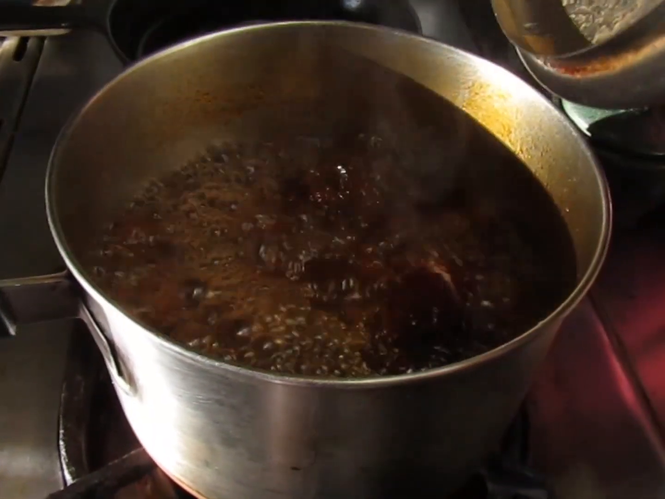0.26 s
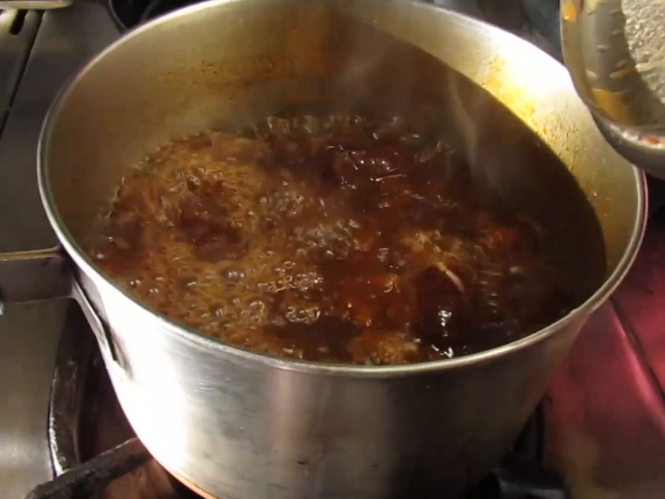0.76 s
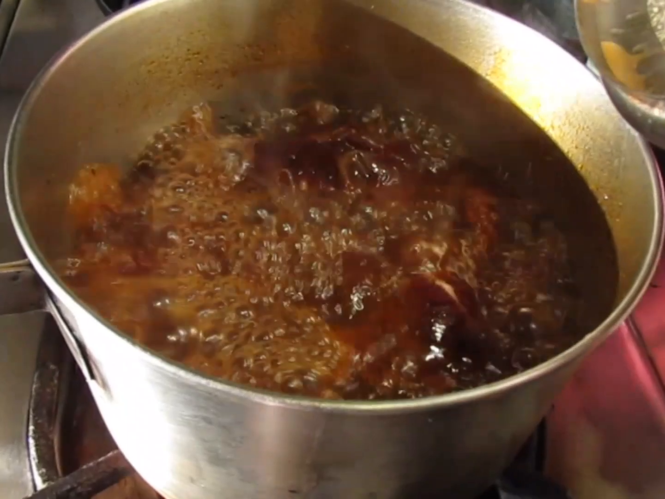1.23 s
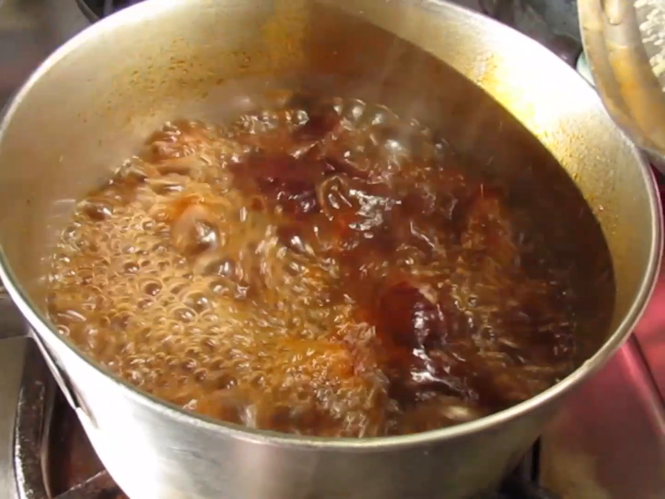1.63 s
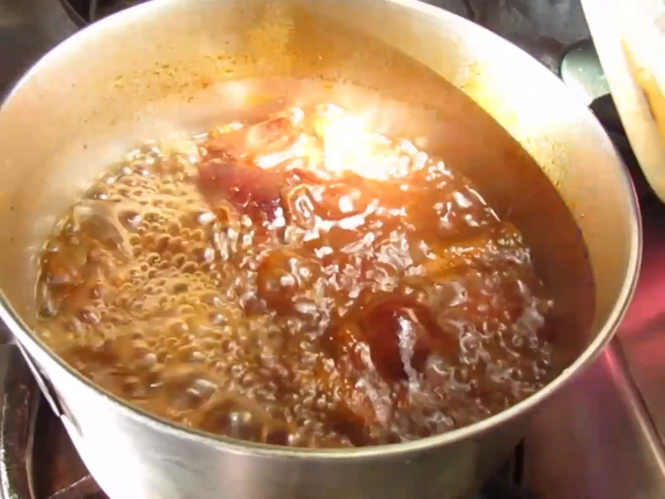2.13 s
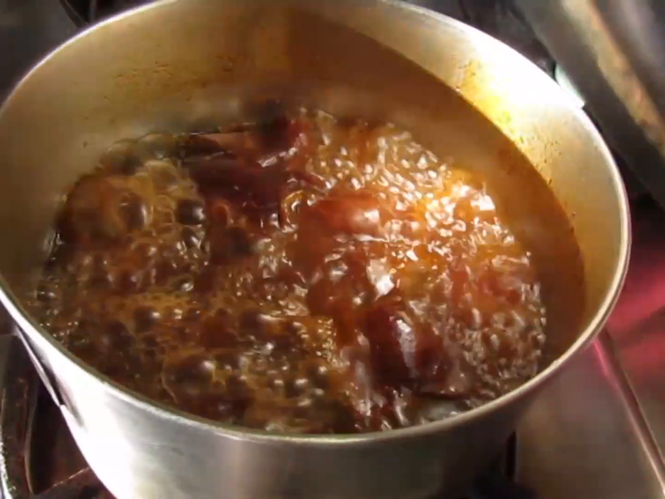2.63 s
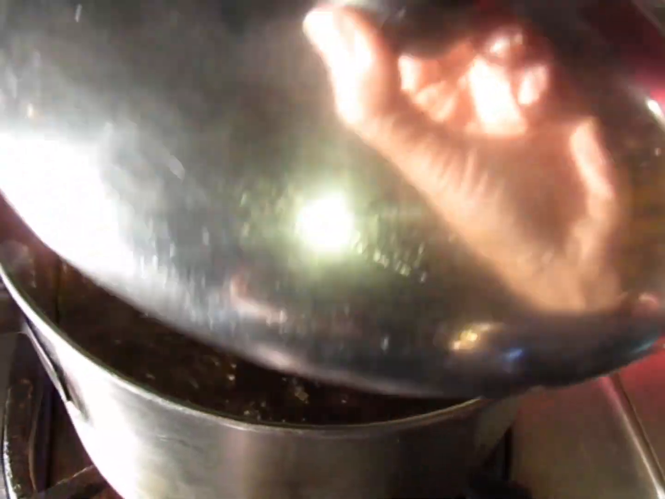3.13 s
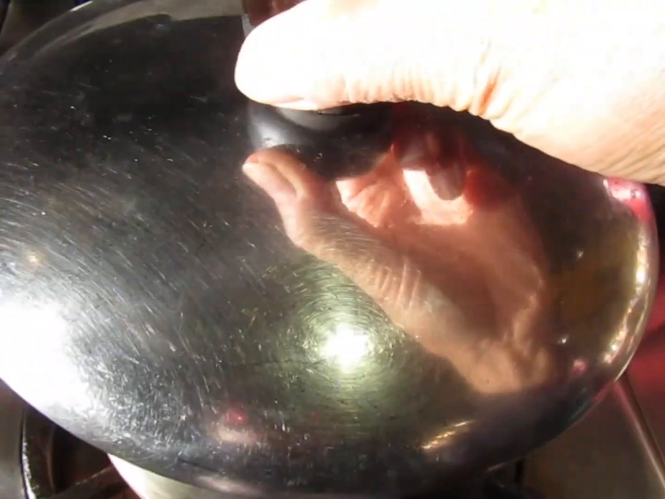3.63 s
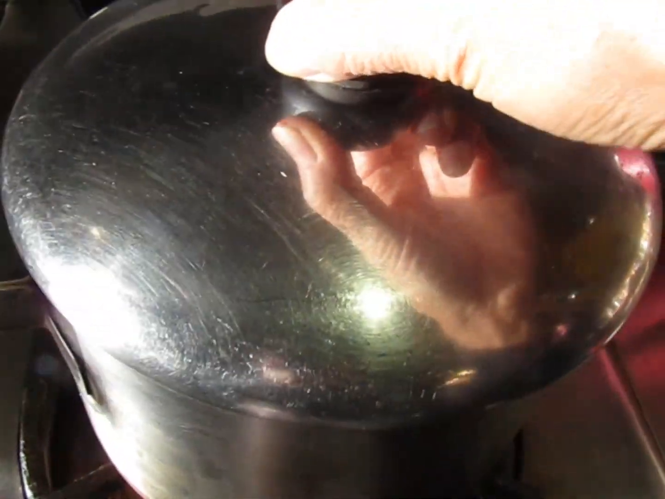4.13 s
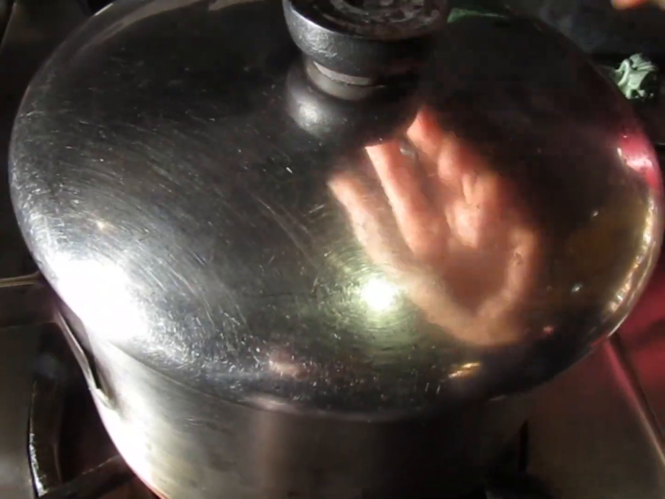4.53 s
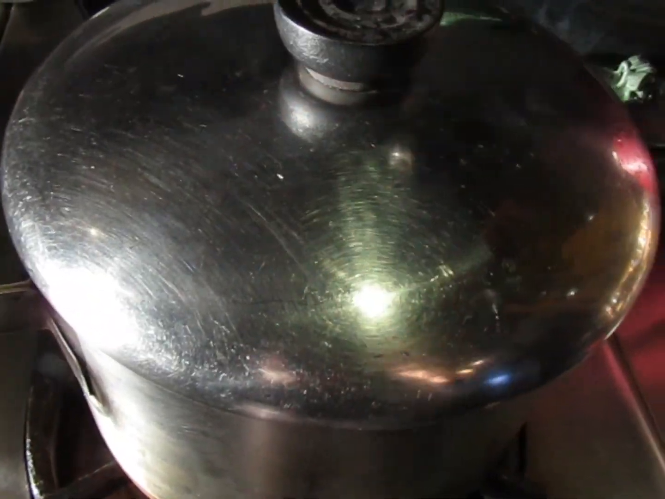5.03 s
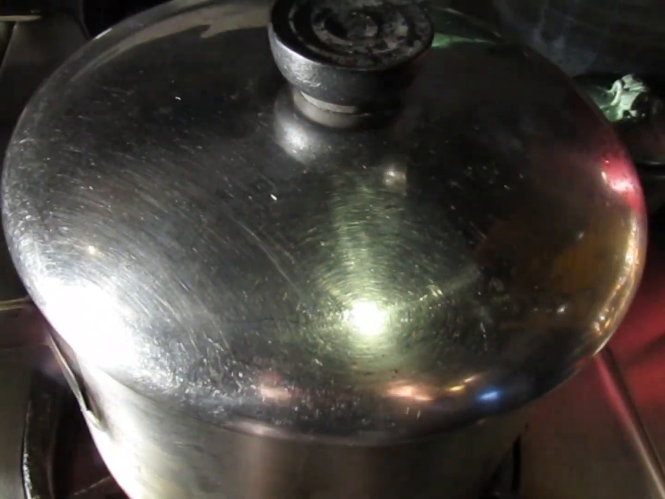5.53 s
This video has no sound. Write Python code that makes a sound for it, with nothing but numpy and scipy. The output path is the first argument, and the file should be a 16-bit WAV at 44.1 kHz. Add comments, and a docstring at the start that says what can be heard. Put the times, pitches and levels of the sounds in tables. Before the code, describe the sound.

Close-up rolling boil of broth in a metal pot: plopping bubbles, snapping films and low burbling, with a short lull and a sudden stop.

```python
"""Liquid gurgles very close to a stereo microphone: gas pockets are drawn out, snap open and ring,
thin films crackle into a narrow air column, spray hisses in it and the flow heaves in the bass.
The gurgling pauses, dry gas rushes through, and the liquid returns more sparsely.
Then the whole strip starts again and is cut off; a faint hiss lies under all of it and is left alone."""
import sys
import numpy as np
from scipy import signal
from scipy.fft import rfft, irfft, next_fast_len
from scipy.io import wavfile
from scipy.ndimage import uniform_filter1d

SR = 44100
rng = np.random.default_rng(int(sys.argv[2]) if len(sys.argv) > 2 else 0)


def wav_out(sig):
    """Save sig, one row per channel (or a flat mono array), as 16-bit PCM at SR to the path in sys.argv[1]."""
    wavfile.write(sys.argv[1], SR, np.round(np.clip(np.atleast_2d(sig).T, -1, 1) * 32767).astype(np.int16))


N = 254006
STRIP = 174079  # samples until the strip starts again
POP_LEAD = 300  # samples of suction ahead of each snap

# resonances of the narrow air column: mode_hz, width_hz, level_db
COLUMN = [(2070, 98, -6.5), (3250, 484, -2), (4410, 330, -6), (6000, 410, -11.5), (7780, 320, -14),
          (8190, 270, -8), (9870, 207, -11.5), (12740, 920, -10.5), (12700, 1400, -17), (14600, 440, -10.5)]


def amp(db):
    """Decibels to gain."""
    return 10 ** (np.asarray(db) / 20)


def evened(x):
    """Scales to rms 1."""
    return x / np.sqrt(np.mean(x ** 2) + 1e-20)


def read(points, hz):
    """Reads a curve of (frequency, value) points on a log-frequency axis."""
    point_hz, value = np.transpose(points)
    return np.interp(np.log(hz + 1), np.log(point_hz + 1), value)


def coloured(x, points):
    """Filters x by a spectrum of (Hz, dB) points."""
    size = next_fast_len(len(x))
    gain = amp(read(points, np.fft.rfftfreq(size, 1 / SR)))
    return irfft(rfft(x, size) * gain, size)[:len(x)]


def add(mix, start_s, sound):
    """Lays a sound into the mix, trimming whatever overhangs either end."""
    at = round(start_s * SR)
    part = mix[max(at, 0):][:len(sound) + min(at, 0)]
    part += sound[max(-at, 0):][:len(part)]


def wander(seconds):
    """Smoothed noise of rms 1, averaged twice over a span of the given length."""
    span = round(seconds * SR)
    return evened(uniform_filter1d(uniform_filter1d(rng.standard_normal(STRIP), span), span))


def random_sizes(per_s, spread_db, limit):
    """Events at random moments, with levels drawn from a capped exponential spread."""
    size = amp(spread_db * np.minimum(rng.exponential(1, STRIP), limit))
    return size * (rng.random(STRIP) < per_s / SR)


def busy(x, seconds):
    """How lively x is: its power rises fast and fades slowly, so small sounds trail the large ones."""
    fade = np.exp(-1 / (seconds * SR))
    power = uniform_filter1d(x ** 2, round(0.2 * seconds * SR))
    return np.sqrt(abs(signal.lfilter([1 - fade], [1, -fade], power)))


def flow(column):
    """One control curve of the flow in dB: column 1 drives the heave, column 2 the spray."""
    # flow while it gurgles, as it stops and after the pause, in sections: time_s, heave_db, spray_db
    sections = [
        [(0.0, -31, -35), (0.066, -21.5, -25), (0.278, -26.5, -28), (0.352, -33, -40.5), (0.378, -21.5, -30),
         (0.562, -16, -30), (0.876, -32, -29), (0.922, -21, -27.5), (0.976, -29, -34), (1.11, -14.5, -25.5),
         (1.27, -36.5, -39)],
        [(1.28, -31, -19.5), (1.302, -12, -26.5), (1.812, -25, -26.5), (1.85, -15.5, -23.5), (2.008, -16, -31),
         (2.024, -26, -32.5), (2.104, -9.5, -30.5), (2.164, -20, -31.5), (2.196, -29, -37.5),
         (2.248, -15, -21.5), (2.425, -19, -30)],
        [(2.435, -24, -66.5), (2.449, -43, -59), (2.653, -77, -70), (2.797, -76.5, -68), (2.841, -51, -59.5),
         (2.883, -53, -63), (2.899, -33, -52), (2.947, -25, -49), (2.975, -13, -34), (3.0, -15, -40)],
        [(3.01, -12, -42), (3.088, -31, -42.5), (3.168, -16.5, -29.5), (3.324, -24, -33), (3.434, -39, -41.5),
         (3.554, -30, -24), (3.614, -34, -43.5), (3.684, -20.5, -36.5), (3.818, -22, -21.5),
         (3.908, -50, -36.5), (3.947, -45, -41)],
    ]
    return np.interp(np.arange(STRIP) / SR, *np.vstack(sections).T[[0, column]])


def pop(hz, t60, push_db):
    """Suction grows while the pocket is drawn out; it snaps, rings with rising pitch and pushes air out."""
    t = np.arange(-POP_LEAD, 900) / SR
    after, before = np.maximum(t, 0), np.minimum(t, 0)
    turns = hz * after * (1 + 8 * after)
    decay = amp(-60 * after / np.clip(t60, .004, .06))
    ring = -np.exp(before * 7 * hz) * np.cos(2 * np.pi * turns) * decay
    draw = -np.exp(before / 0.00051) * np.exp(-after / 0.00042)
    push = 0.38 * (1 - np.exp(-after / 0.0018)) * np.exp(-(after / 0.0064) ** 2)
    return ring + amp(push_db) * (draw + push)


def pops():
    """The loud pockets, each snapping open at its own moment with its own ring and push."""
    # bursting pockets: snap_s, level_db, ring_hz, ring_t60_s (kept to 0.004-0.06), push_db (against the ring)
    pockets = [(0.0029, -18, 720, 0.048, -14.5), (0.0326, -13.5, 620, 0.041, -5),
               (0.0476, -10, 720, 0.011, -9), (0.062, -9.5, 1160, 0.012, -10),
               (0.0699, -11, 1390, 0.018, 5.5), (0.085, -12, 1306, 0.011, 2.5),
               (0.0907, -15, 1295, 0.015, -2), (0.0988, -7.5, 1043, 0.01, -1),
               (0.1216, -6.5, 834, 0.011, -6), (0.129, -6, 1086, 0.013, -13.5),
               (0.1403, -11, 750, 0.018, -6.5), (0.1573, -11, 793, 0.015, -23),
               (0.2006, -13.5, 676, 0.0079, 3.5), (0.2491, -9, 1196, 0.01, 1.5),
               (0.2677, -15, 825, 0.009, -13), (0.2763, -16.5, 1170, 0.018, -13.5),
               (0.31, -33.5, 790, 0.013, 5), (0.3873, -13.5, 792, 0.011, 1.5),
               (0.4125, -14.5, 1040, 0.033, -1), (0.4264, -16.5, 635, 0.062, -1.5),
               (0.4496, -8.5, 1410, 0.015, -1.5), (0.4557, -2.5, 800, 0.023, -15),
               (0.466, -5, 846, 0.045, -13.5), (0.4823, -14.5, 1030, 0.012, -10.5),
               (0.494, -13, 736, 0.012, -2.5), (0.5032, -7.5, 838, 0.014, -3.5),
               (0.519, -6, 1310, 0.011, -25), (0.5278, -9.5, 1274, 0.011, 1),
               (0.5373, -21.5, 457, 0.0079, 0), (0.542, -8.5, 672, 0.012, -3),
               (0.5607, -10, 1227, 0.011, -2), (0.5658, -15, 1394, 0.017, -2),
               (0.5762, -12.5, 1330, 0.011, -4), (0.5883, -12, 1340, 0.014, -3),
               (0.6046, -12, 781, 0.0193, -4.5), (0.6134, -14, 736, 0.12, 6.5),
               (0.6608, -8.5, 765, 0.011, 3), (0.6821, -9, 790, 0.01, -2),
               (0.6952, -7.5, 1420, 0.0087, -8.5), (0.728, -10, 1070, 0.018, -13.5),
               (0.7784, -10, 1270, 0.0061, -4.5), (0.783, -6.5, 1130, 0.013, -1),
               (0.8073, -9, 800, 0.0079, -8), (0.819, -16.5, 660, 0.017, -7),
               (0.845, -20, 1080, 0.033, -11), (0.8716, -10.5, 790, 0.013, -15),
               (0.9085, -10.5, 858, 0.013, -2.5), (0.9168, -11.5, 667, 0.0093, -0.5),
               (0.9222, -15, 460, 0.0044, 6.5), (0.9285, -6.5, 928, 0.027, 1.5),
               (0.9425, -7, 1032, 0.025, -14), (0.9539, -6, 780, 0.025, -25), (0.9653, -9, 760, 0.018, -8),
               (0.999, -11, 670, 0.014, -14), (1.0115, 3, 1620, 0.012, -7), (1.039, -7.5, 770, 0.011, -12),
               (1.053, -7, 780, 0.013, -12.5), (1.0685, -21, 640, 0.02, 1), (1.0744, -3, 985, 0.019, -10),
               (1.0913, -10, 720, 0.011, 1.5), (1.099, -3.5, 770, 0.016, -3.5),
               (1.112, -12.5, 1415, 0.015, -3), (1.1185, -1.5, 1226, 0.013, -3.5),
               (1.1286, -3, 1070, 0.025, -5), (1.1341, -3, 1100, 0.017, -1),
               (1.147, -4.5, 890, 0.012, -7.5), (1.1517, -8, 757, 0.021, -14.5),
               (1.1637, -3.5, 833, 0.013, -13), (1.1716, -14.5, 1170, 0.01, 4.5),
               (1.1839, -4, 1350, 0.01, -11), (1.203, -12, 1200, 0.02, -17.5),
               (1.2177, -5, 1085, 0.013, -20), (1.2274, -12, 700, 0.01, -10.5),
               (1.2472, -10.5, 790, 0.013, -9), (1.286, 16.5, 840, 0.015, -21),
               (1.31, 2.5, 1125, 0.021, -7.5), (1.318, -17, 506, 0.0085, 1),
               (1.3243, -5.5, 934, 0.017, -13), (1.3383, -16, 1270, 0.011, -1),
               (1.3643, -9.5, 1030, 0.0088, 1), (1.394, -13.5, 790, 0.011, 0),
               (1.4012, -8.5, 1160, 0.011, -9.5), (1.4155, -10.5, 704, 0.013, -3),
               (1.4285, -13, 470, 0.0075, 7), (1.4443, -10.5, 450, 0.011, 4.5),
               (1.4525, -4.5, 961, 0.026, -6), (1.4614, -11, 880, 0.021, -1),
               (1.4773, -14, 1160, 0.011, 7.5), (1.522, -3.5, 780, 0.017, -0.5),
               (1.5275, -10, 1180, 0.017, 3.5), (1.5353, -11, 470, 0.01, 4), (1.5451, -5, 650, 0.011, -5),
               (1.5612, -11, 753, 0.0092, -2), (1.5862, -12.5, 733, 0.027, -10),
               (1.597, -13, 450, 0.011, 0), (1.614, -12.5, 675, 0.03, -10), (1.6338, -5, 1282, 0.033, 4.5),
               (1.651, -10, 1220, 0.019, -15.5), (1.6735, -5, 780, 0.02, -12.5),
               (1.6925, -13.5, 763, 0.035, -2), (1.7047, -17, 813, 0.015, -6.5),
               (1.7139, -8, 1010, 0.0099, 0.5), (1.73, -10.5, 1490, 0.033, 1),
               (1.738, -10.5, 1220, 0.029, -8.5), (1.7444, -8, 920, 0.015, -7.5),
               (1.7674, -8, 693, 0.066, -5.5), (1.8136, -0.5, 754, 0.04, -0.5),
               (1.832, -14, 1017, 0.0086, -9), (1.8488, -14, 816, 0.013, 6.5),
               (1.8598, -14, 499, 0.012, 7.5), (1.8702, -6, 1180, 0.012, 1),
               (1.8825, -3, 1130, 0.024, -15.5), (1.9042, -4.5, 920, 0.013, -4),
               (1.9306, -4, 880, 0.012, -11), (1.961, -12, 1200, 0.01, 0.5), (1.9666, -8.5, 683, 0.0099, 2),
               (1.975, -12.5, 750, 0.019, 0), (1.981, -8, 760, 0.013, -13), (1.99, -8.5, 1180, 0.011, 3.5),
               (2.0062, -12, 967, 0.025, -3.5), (2.0354, -26, 770, 0.026, -25),
               (2.0534, -0.5, 753.4, 0.019, -21.5), (2.0687, -6.5, 780, 0.017, -2),
               (2.1033, -4, 755, 0.015, -6), (2.1174, -8.5, 1530, 0.011, 1), (2.1223, -11, 730, 0.011, 7),
               (2.1433, -1, 680, 0.011, -4), (2.149, -16, 870, 0.013, -1), (2.1555, -5, 1040, 0.023, -3.5),
               (2.1637, -19.5, 450, 0.011, 1.5), (2.1739, -7.5, 850, 0.021, -21),
               (2.202, -14.5, 600, 0.027, -8), (2.2276, -2, 640, 0.024, -20), (2.2449, -10, 870, 0.018, -2),
               (2.2611, -15, 640, 0.012, -24), (2.2666, -3.5, 1520, 0.011, -10.5),
               (2.2869, -6, 1049, 0.021, -1.5), (2.2927, -8.5, 786, 0.011, -4.5),
               (2.3041, -4.5, 450, 0.0097, -2.5), (2.3654, -12, 1100, 0.011, 4),
               (2.3846, -16.5, 510, 0.016, -5), (2.4045, -9, 776, 0.0089, -1.5),
               (2.4284, -15, 1075, 0.022, -9.5), (2.467, -29, 660, 0.022, -18),
               (2.528, -39, 794, 0.02, -13), (3.0003, -16.5, 447, 0.015, 7),
               (3.0371, -9.5, 1480, 0.0074, 4), (3.069, -7, 482, 0.0037, -3),
               (3.1341, -8.5, 1550, 0.015, 2.5), (3.1542, -3, 1542, 0.0075, -13.5),
               (3.167, -11, 1307, 0.011, -3.5), (3.1738, -2, 1240, 0.015, -24),
               (3.1976, -11, 1155, 0.013, 2), (3.2178, -13, 1270, 0.011, 6.5),
               (3.247, -13.5, 790, 0.026, 2), (3.265, -17.5, 706, 0.041, -13),
               (3.3095, -11, 1450, 0.005, -6), (3.3432, -14, 920, 0.0063, -4),
               (3.3678, -17.5, 800, 0.01, -18), (3.4189, -16, 540, 0.013, -10),
               (3.4359, -19.5, 945, 0.018, -20), (3.4615, -12.5, 710, 0.034, -13),
               (3.4905, -12.5, 815, 0.015, -15), (3.508, -7.5, 1120, 0.028, -20),
               (3.5287, -0.5, 814, 0.0099, -16.5), (3.549, -19, 700, 0.02, -10),
               (3.5677, -5.5, 812, 0.011, -15), (3.6244, -22, 730, 0.04, -22), (3.6707, -9, 1180, 0.014, 5),
               (3.6958, -10, 768, 0.011, -4), (3.7026, -13.5, 1280, 0.015, -2),
               (3.7267, -8, 620, 0.011, -13), (3.742, -4, 824, 0.021, -12), (3.747, -5, 720, 0.0077, -9),
               (3.7524, -4, 1130, 0.01, -7.5), (3.782, -14, 1210, 0.011, 4),
               (3.8205, -11.5, 503, 0.011, -0.5), (3.8358, -4, 970, 0.017, -22),
               (3.8591, -8, 696, 0.041, -20), (3.9193, -12.5, 930, 0.022, -30)]
    out = np.zeros(STRIP)
    for snap_s, level_db, hz, t60, push_db in pockets:
        add(out, snap_s - POP_LEAD / SR, amp(level_db) * pop(hz, t60, push_db))
    return out


def froth(loud):
    """Many small pockets of random size burst among the loud ones and simmer on in the lulls."""
    size = random_sizes(per_s=200, spread_db=2.0, limit=3)
    kind, out = rng.integers(0, 16, STRIP), np.zeros(STRIP)
    for k, hz in enumerate(np.geomspace(330, 1500, num=16)):
        small_pop = pop(hz, .012, -8.)
        out += signal.oaconvolve(size * (kind == k), small_pop)[POP_LEAD:STRIP + POP_LEAD]
    trailing = amp(-5.0) * busy(loud, 0.013)
    simmer = amp(flow(column=2) + 0.5)
    return evened(out) * np.hypot(trailing, simmer)


def snap(bright_hz, luck, puff):
    """A short ragged puff strikes the air column; modes near the film's own pitch ring most and bend."""
    t, out = np.arange(400) / SR, np.zeros(400)
    burst = puff * (1 - np.exp(-t / 0.00017)) * np.exp(-t / 0.0011)
    bend = t * (1 + 12 * luck[-1] * t)  # one random glide, up or down, for all modes
    modes = COLUMN + [(bright_hz, 350, 1.)]  # the film adds a mode of its own
    for (hz, width, db), u in zip(modes, luck):
        near_db = -8 * abs(np.log2(hz / bright_hz))
        mode = np.sin(2 * np.pi * hz * (1 + 0.017 * u) * bend) * np.exp(-np.pi * .9 * width * t)
        out += amp(1.49 * db + near_db + 3.5 * u) * signal.fftconvolve(burst, mode)[:400]
    return out / abs(out).max()


def snaps():
    """The loud films, each striking the column with a fresh ragged puff."""
    # snapping films: snap_s, peak_db, brightest_hz
    loud_films = [(0.0159, -7, 4780), (0.037, -8, 3360), (0.0688, -13, 8160), (0.0995, -10, 2170),
                  (0.1162, -24, 3570), (0.1285, -10, 4900), (0.158, -13.5, 2220), (0.175, -14, 3600),
                  (0.2012, -6, 9750), (0.249, -11.5, 8590), (0.2625, -16, 2320), (0.269, -11.5, 2170),
                  (0.3753, -10.5, 3600), (0.397, -8, 3500), (0.449, -12.5, 4160), (0.4555, -13, 4050),
                  (0.4655, -16, 2060), (0.4967, -15.5, 2830), (0.52, -14, 4300), (0.53, -8, 2070),
                  (0.5613, -4, 2240), (0.566, -15, 3440), (0.572, -7.5, 6400), (0.6037, -3, 5800),
                  (0.627, -13.5, 2020), (0.6538, -14, 10240), (0.7005, -31.5, 2830), (0.726, -20, 3240),
                  (0.7847, -11.5, 6600), (0.8035, -6.5, 3370), (0.8545, -19, 2100), (0.8869, -20.5, 3570),
                  (0.916, -13.5, 1980), (0.9216, -10, 3800), (0.9417, -17, 3230), (0.9652, -12, 2070),
                  (0.9967, -15.5, 2080), (1.0146, -14, 2030), (1.0517, -2, 2260), (1.0733, -8, 2000),
                  (1.1104, -10, 8190), (1.1191, -9.5, 3410), (1.1327, -12, 2020), (1.146, -7.5, 2080),
                  (1.1554, -16, 2090), (1.164, -8.5, 2020), (1.1708, -10.5, 3250), (1.2036, -12.5, 3900),
                  (1.2457, -9.5, 3330), (1.2534, -15, 3360), (1.2854, -2, 2010), (1.2945, -11, 2030),
                  (1.3008, -2.5, 3600), (1.3092, -10, 2220), (1.3371, -14.5, 2090), (1.3638, -14.5, 8100),
                  (1.393, -10.5, 2000), (1.4014, -28.5, 2100), (1.4518, -12.5, 3240), (1.534, -18, 3410),
                  (1.5477, -10.5, 3190), (1.562, -8, 2400), (1.5918, -10, 3300), (1.621, -17, 7600),
                  (1.625, -12.5, 3060), (1.6343, -9, 8000), (1.6737, -5, 3900), (1.6887, -11.5, 2070),
                  (1.6965, -17, 3640), (1.703, -16.5, 2080), (1.7095, -4, 2140), (1.7406, -11.5, 3450),
                  (1.746, -21, 4930), (1.7673, 2, 2170), (1.799, -16, 8000), (1.8494, -10.5, 6750),
                  (1.8684, -17, 3800), (1.877, -13.5, 3920), (1.9037, -15.5, 3360), (1.9237, -17.5, 2160),
                  (1.9288, -4.5, 2260), (1.9602, -14.5, 2120), (1.9747, -10, 2130), (1.9863, -6.5, 4040),
                  (2.035, -15, 2410), (2.0514, -7.5, 2010), (2.0567, -16, 7760), (2.0672, -7, 2850),
                  (2.1015, -9, 2110), (2.1216, 0, 2900), (2.129, -13, 2710), (2.1515, -9, 7500),
                  (2.184, -8.5, 4800), (2.2082, -22, 3420), (2.2429, -9, 4770), (2.248, -12, 2770),
                  (2.2597, -4.5, 2130), (2.267, -10.5, 7500), (2.2768, -20, 3440), (2.2856, -7.5, 7830),
                  (2.31, -9, 2400), (2.3864, -12.5, 3700), (3.036, -18, 3040), (3.0687, -10, 2060),
                  (3.134, -14, 3140), (3.1546, -16, 3600), (3.1666, -13.5, 4900), (3.196, -8, 8600),
                  (3.216, -15, 8250), (3.266, -21, 4350), (3.2924, -18, 2970), (3.3094, -21, 2080),
                  (3.3565, -13.5, 2800), (3.369, -24, 4530), (3.4814, -13, 3570), (3.5275, -15.5, 2180),
                  (3.5494, -9, 4780), (3.5575, -9, 10400), (3.609, -17, 3400), (3.625, -14.5, 4250),
                  (3.6698, -1.5, 4580), (3.7035, -7.5, 3390), (3.7076, -8.5, 2510), (3.7336, -10.5, 5900),
                  (3.7531, -8.5, 2300), (3.8194, -11, 10700), (3.8532, -8, 4640)]
    out = np.zeros(STRIP)
    luck = rng.standard_normal((len(loud_films), len(COLUMN) + 401))  # 400 puff samples, then the modes
    for (snap_s, peak_db, hz), u in zip(loud_films, luck):
        add(out, snap_s - .0003, amp(peak_db) * snap(hz, u[400:], u[:400]))
    return out


def films():
    """Small films snap at random, 64 a second on average, as loud as the spray control allows."""
    size = random_sizes(per_s=64, spread_db=3.33, limit=3)
    kind, out = rng.integers(0, 20, STRIP), np.zeros(STRIP)
    luck = rng.standard_normal((20, len(COLUMN) + 401))
    for k, hz in enumerate(np.geomspace(2000, 7000, num=20)):
        small_snap = snap(hz, luck[k, 400:], luck[k, :400])
        out += signal.oaconvolve(size * (kind == k), small_snap)[:STRIP]
    return evened(out) * amp(flow(column=2) - 5.5)


def spray(loud):
    """Escaping gas hisses in the air column, each mode coming and going; droplets plip near one mode."""
    # colour of the open air noise: point_hz, level_db (per Hz)
    air_colour = [(1200, 15), (2500, -14.5), (6000, -7), (10000, -27.5), (13000, -6), (16000, 6)]
    drops = random_sizes(per_s=800, spread_db=4.5, limit=3.5)
    kind, t = rng.integers(0, 3 * len(COLUMN), STRIP), np.arange(300) / SR
    hissing, plips = np.zeros((2, STRIP))
    for k, (hz, width, db) in enumerate(COLUMN):
        fading = amp(db) * np.exp(-np.pi * width * (1 + hz / 14000) * t)  # a ragged stream blurs the upper modes
        gas = rng.standard_normal(STRIP) * amp(4.5 * wander(.012))
        hissing += signal.oaconvolve(gas, fading * np.sin(2 * np.pi * hz * t))[:STRIP]
        for j, shift in enumerate((.9, 1.01, 1.12)):
            rising = np.sin(2 * np.pi * hz * shift * t * (1 + 8 * t))
            plip = fading * rising * np.minimum(t / .0004, 1)
            plips += signal.oaconvolve(drops * (kind == 3 * k + j), plip)[:STRIP]
    steady, flare = amp(flow(column=2)), busy(loud, 0.0072)  # the flare follows the snapping films
    air = evened(coloured(rng.standard_normal(STRIP), air_colour)) * amp(3 * wander(0.0052))
    air *= np.hypot(amp(-19.5) * steady, amp(-25) * flare)
    hissing = evened(hissing) * np.hypot(amp(-16.0) * steady, amp(-8) * flare)
    plips = evened(plips) * amp(5.3 * wander(0.015))
    plips *= np.hypot(amp(-14.5) * steady, amp(-17.5) * flare)
    return air + hissing + plips


def rush():
    """Dry gas before the liquid returns: fluttering noise in the emptied column swells, holds, dies away."""
    # resonances of the emptied column: point_hz, level_db (per Hz)
    dry_column = [(1100, -30), (1600, -1), (2350, -13.5), (3250, 1.5), (3950, -13.5), (4650, 4), (5500, -9),
                  (6200, -2), (7000, -9.5), (8300, -3.5), (9200, -10), (11300, -5.5), (12100, -24),
                  (14800, -11), (16000, -13)]
    start_s, rise_s, hold_s, level_db, fade_db_per_s = 2.882, 0.15, 0.12, -32.5, 111
    t = np.arange(STRIP) / SR - start_s
    fade_db = -fade_db_per_s * np.maximum(t - rise_s - hold_s, 0)
    level = np.clip(t / rise_s, 0, 1) * amp(level_db + fade_db + 4.2 * wander(0.0027))
    return level * evened(coloured(rng.standard_normal(STRIP), dry_column))


def passage():
    """Gain of the passage: a plug of liquid shuts it within a few milliseconds and it opens again."""
    # plugs: start_s, length_s, change_db (positive values leave the passage open)
    plugs = [(0.164, 0.021, -8), (0.292, 0.016, -12), (0.367, 0.03, 2.5), (0.74, 0.012, -19),
             (0.826, 0.017, -22), (1.004, 0.013, -19.5), (1.186, 0.0099, -16), (1.23, 0.0073, -16.5),
             (1.274, 0.04, -27), (1.769, 0.051, -16), (1.912, 0.0073, -11), (2.011, 0.013, -12),
             (2.042, 0.0068, 0.5), (3.382, 0.026, -13), (3.451, 0.012, -8), (3.528, 0.0072, -28),
             (3.599, 0.0051, -26), (3.649, 0.036, -7), (3.87, 0.038, -11.5)]
    shut_db = np.zeros(STRIP)
    for start_s, length_s, change_db in plugs:
        add(shut_db, start_s, np.full(round(length_s * SR), np.minimum(change_db, 0.)))
    return amp(uniform_filter1d(shut_db, 110))


def heave(loud):
    """Slow pressure lumps of the flow: low coloured noise that sags when the bursts pause."""
    # colour of the lumps: point_hz, level_db (per Hz)
    lump_colour = [(8.8, -34.5), (15, -0.5), (91, 2), (151, -1.5), (217, -4.5), (300, -2.5), (390, -37.5),
                   (660, -120)]
    lumps = evened(coloured(rng.standard_normal(STRIP), lump_colour))
    lively = busy(loud, 0.015) / (busy(loud, 0.28) + 1e-4)  # bursts now against bursts of late
    return lumps * amp(flow(column=1)) * (0.29 + 0.28 * lively)


def flutters():
    """The liquid column bobs for a moment: a few uneven low swings each, swelling and fading."""
    # bobbing: start_s, length_s, level_db, pitch_hz (mean)
    bobs = [(.44, .07, -21, 89.9), (1.101, .07, -15, 106), (1.285, .07, -13, 140),
            (1.408, .08, -12.5, 109.8), (1.49, .07, -14, 140.1), (1.829, 0.067, -14, 125.4),
            (1.958, .06, -16.5, 130), (2.081, 0.075, -14, 110.2), (2.238, .07, -15.5, 105)]
    out = np.zeros(STRIP)
    uneven_s = np.cumsum(1 + .25 * wander(.008)) / SR  # a clock that hurries and lags
    for start_s, length_s, level_db, hz in bobs:
        part = uneven_s[round(start_s * SR):][:round(length_s * SR)]
        swell = np.hanning(len(part)) ** 0.67
        add(out, start_s, amp(level_db) * swell * np.sin(2 * np.pi * hz * part))
    return out


def sways():
    """Pressure as the flow stops and starts: one slow up-and-down swing each."""
    # swings: start_s, level_db, length_s
    swings = [(2.482, -31.5, 0.055), (2.843, -30, 0.055), (2.904, -19, 0.031), (2.939, -13, 0.013),
              (2.959, -11, 0.01), (2.988, -21, 0.01), (3.014, -12, 0.0097), (3.04, -27, 0.01)]
    out = np.zeros(STRIP)
    for start_s, level_db, length_s in swings:
        phase = np.arange(0, 1, 1 / (length_s * SR))
        swing = np.sin(2 * np.pi * phase ** 0.92) * np.sin(np.pi * phase) ** 1.5
        add(out, start_s, amp(level_db) * swing)
    return out


def pair(mid):
    """Two close capsules: bass leans left; in the treble each burst falls a little to one side or the other."""
    # lean of the bass: time_s, left_against_right_db
    bass_lean = [(0, 7), (0.401, 4.5), (1.2, 2.5), (2.399, 4), (2.85, 10), (3.2, 9), (3.947, 7.5)]
    # microphone pair, difference against sum: point_hz, level_db
    apart = [(900, -34.5), (1300, -53.5), (2000, -9), (3500, -17), (7000, -6.5), (15000, -15.5)]
    bass = signal.lfilter(*signal.butter(1, 260 / (SR / 2)), mid)
    lean_db = np.interp(np.arange(STRIP) / SR, *np.transpose(bass_lean))
    lean = np.tanh(lean_db * np.log(10) / 40)  # level ratio to side-against-mid gain
    treble = signal.sosfilt(signal.butter(2, 600 / (SR / 2), "high", output="sos"), mid)
    side = lean * bass + coloured(treble * wander(0.0046), apart)
    return np.array([mid + side, mid - side])


def hiss():
    """Faint steady noise, partly shared by both channels, most of all in the bass."""
    # colour of the hiss: point_hz, level_db (per Hz)
    hiss_colour = [(18, -43), (30, -7.5), (233, -2.5), (1670, -10.5), (3140, -9.5), (5900, -9),
                   (12600, -7.5), (16000, -7)]
    # left-right likeness: point_hz, likeness (0 to 1)
    likeness = [(60, 1), (380, 0.31), (2380, 0.1), (15000, 0.11)]
    size = next_fast_len(N)
    hz, (a, b) = np.fft.rfftfreq(size, 1 / SR), rfft(rng.standard_normal((2, size)))
    same = np.clip(read(likeness, hz), 0, 1)
    right = same * a + np.sqrt(1 - same ** 2) * b
    spectra = np.array([a, right]) * amp(read(hiss_colour, hz))
    return amp(-52.5) * evened(irfft(spectra, size)[:, :N])


def scene():
    """The strip plays, starts again and stops dead at the cut, over the hiss."""
    cut_s = 5.306
    ring, crackle, small = pops(), snaps(), films()
    through = ring + froth(ring) + small + spray(crackle + small) + rush()
    gurgle = passage() * through + crackle  # plugs leave the loud films untouched
    strip = pair(gurgle + heave(ring) + sways() + flutters())
    strip = signal.lfilter(*signal.butter(1, 8 / (SR / 2), "high"), strip)  # pressure leaks away slowly
    open_gate = np.clip((cut_s - np.arange(N) / SR) / 0.0026, 0, 1)
    return strip[:, np.arange(N) % STRIP] * open_gate + hiss()


def record(dry):
    """Soft overload near full scale, then a steep band limit."""
    edge_hz = 15800
    x = dry / (1 + abs(dry) ** 6) ** (1 / 6)
    band_limit = signal.firwin(511, edge_hz, window=("kaiser", 9), fs=SR)
    return signal.oaconvolve(x, band_limit[None], "same")


dry = scene()
out = record(dry)
wav_out(out)
```